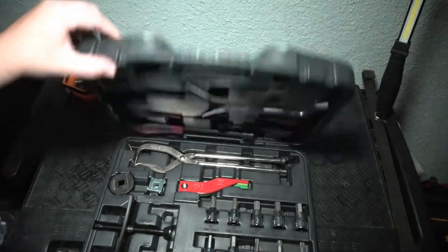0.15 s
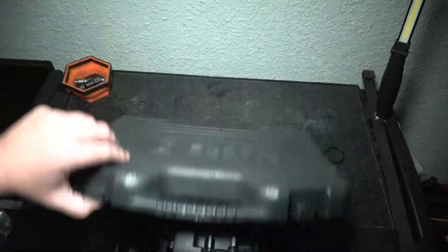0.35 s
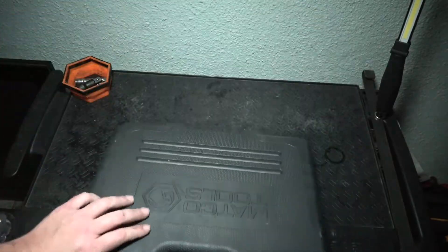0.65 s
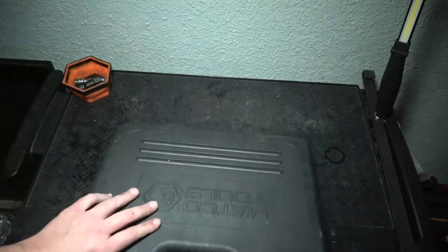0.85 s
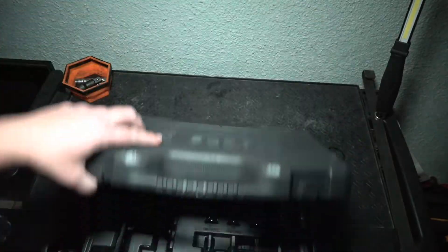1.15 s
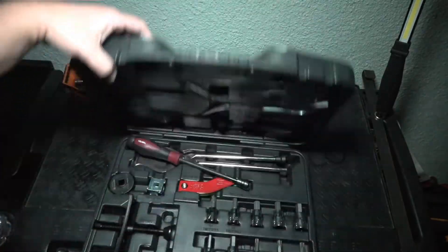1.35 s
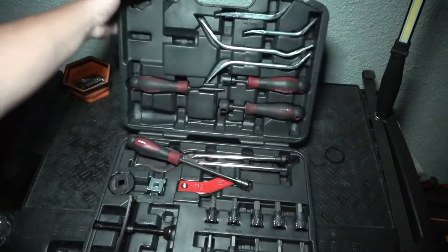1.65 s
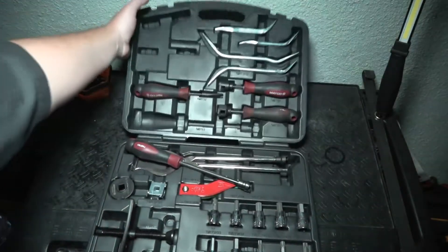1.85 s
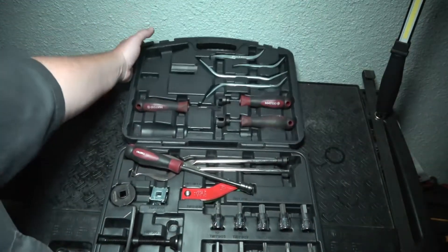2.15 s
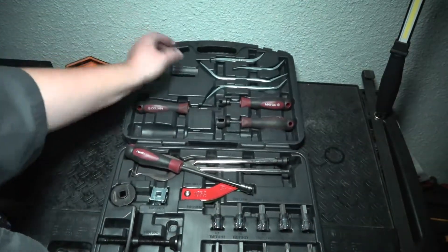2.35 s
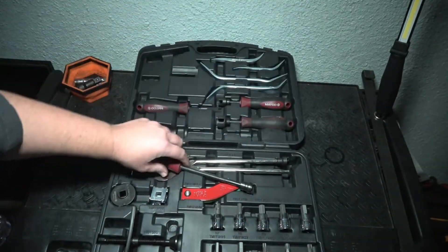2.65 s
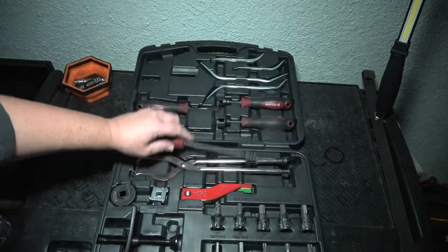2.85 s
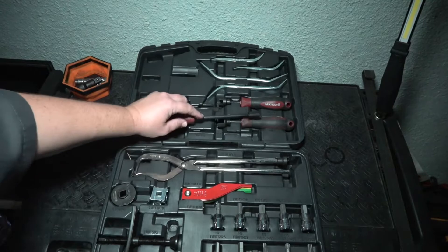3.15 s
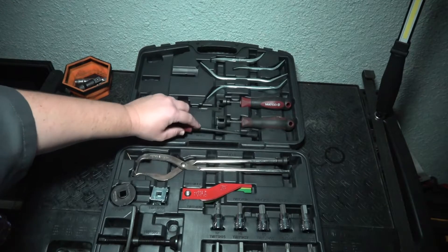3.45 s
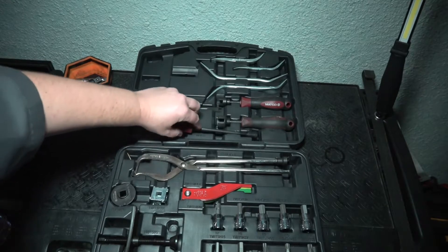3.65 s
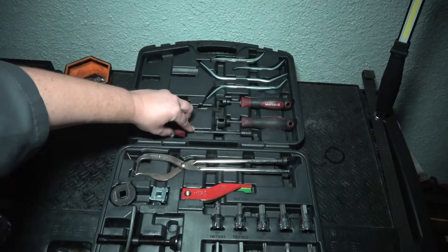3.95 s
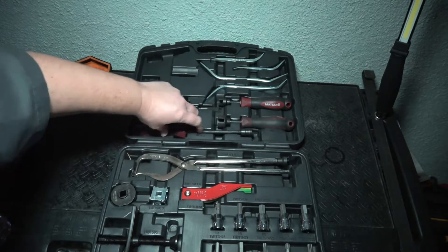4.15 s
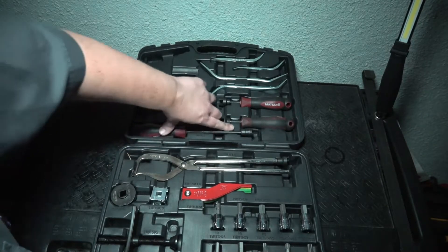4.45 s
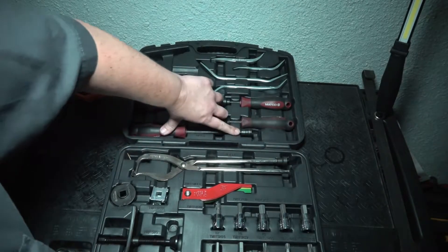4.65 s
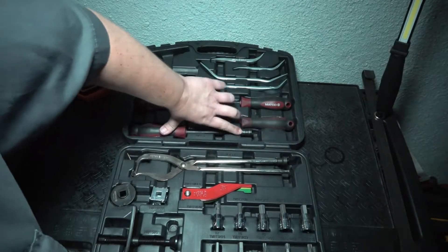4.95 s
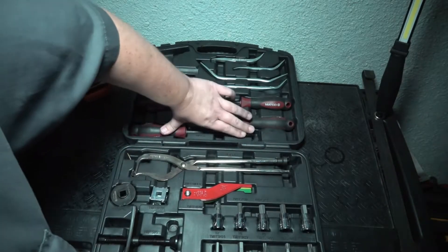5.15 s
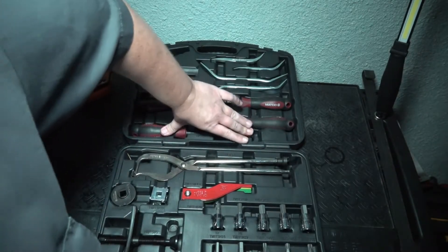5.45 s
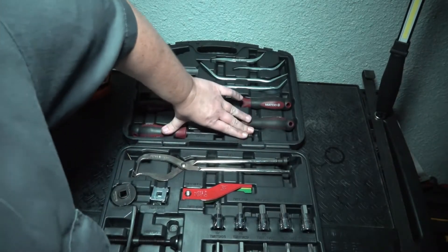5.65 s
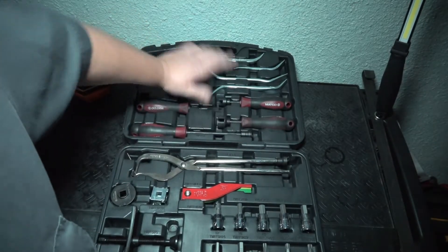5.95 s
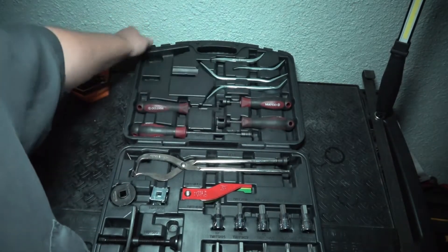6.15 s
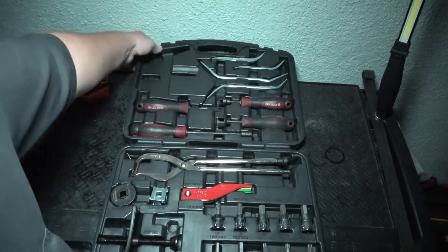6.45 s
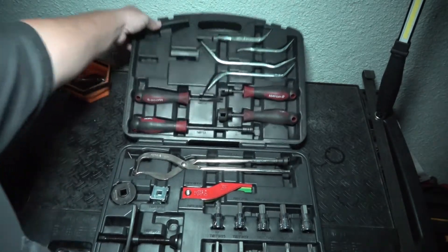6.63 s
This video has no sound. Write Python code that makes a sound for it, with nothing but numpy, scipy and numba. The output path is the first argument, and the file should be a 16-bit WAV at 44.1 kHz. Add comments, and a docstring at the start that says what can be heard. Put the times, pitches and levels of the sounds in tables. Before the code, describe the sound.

A close microphone catches a moulded tool case on a bench: the lid bangs closed, tools jangle, skin and sleeve rustle over plastic, and the lid falls back with a sharp clatter. Separate hard clacks and short gritty scrapes follow as a tool is placed. One huge, flattened thump stands out late, with short dense room reflections, then quiet handling.

```python
"""Plastic tool case on a workbench

A moulded case drops its lid shut with steel tools clattering inside; the lid is lifted and falls open again.
A screwdriver is picked up, pushed into its slot and snapped home with the palm; hand and sleeve rub the case.
Blows are noise bursts plus dying shell modes, tools are dying modes, rubbing is shaped noise.
A small workshop answers with dense reflections, and the limiter of a close camera flattens the loud knocks."""
import sys
import numpy as np
from scipy import signal
from scipy.fft import rfft, irfft
from scipy.io import wavfile
from scipy.ndimage import uniform_filter1d
from numba import njit

SR = 44100
rng = np.random.default_rng(int(sys.argv[2]) if len(sys.argv) > 2 else 0)


def output_pcm(signal):
    """Save a mono or channel-first signal as 16-bit PCM at the path in sys.argv[1].

    Samples are clipped to [-1, 1] before scaling.
    """
    pcm = np.clip(np.atleast_2d(signal).T, -1, 1) * 32767
    wavfile.write(sys.argv[1], SR, np.round(pcm).astype(np.int16))


N = 299288
RING = np.arange(SR // 3) / SR  # time since a blow, s


def amp(db):
    """Decibels to gain."""
    return 10 ** (np.asarray(db) / 20)


def evened(x):
    """Scales to rms 1."""
    return x / np.sqrt(np.mean(x ** 2) + 1e-20)


def unit_hit(x):
    """Scales to the energy of a hundredth of a second at rms 1."""
    return x / np.linalg.norm(x) * np.sqrt(SR / 100)


def read(points, hz):
    """Joins points by straight lines on a log-frequency axis."""
    f, value = np.transpose(points)
    return np.interp(np.log(hz + 1), np.log(f + 1), value)


def add(mix, s, sound):
    """Mixes a sound in at time s."""
    part = mix[round(s * SR):][:len(sound)]
    part += sound[:len(part)]


def noise(spectrum, size):
    """Noise of rms 1 with the shape of a given spectrum."""
    gain = amp(read(spectrum, np.fft.rfftfreq(size, 1 / SR)))
    white = rfft(rng.standard_normal(size))
    return evened(irfft(white * gain, size))


def ring(modes, spread_db):
    """Dying modes; their shares and signs vary at random, as with the spot that is struck."""
    hz, db, t60 = np.transpose(modes)[:, :, None]
    share = amp(db + spread_db * rng.standard_normal(hz.shape)) * rng.choice([-1, 1], hz.shape)
    decay = np.exp(-np.log(1000) * RING / t60)
    return unit_hit((share * decay * np.sin(2 * np.pi * hz * RING)).sum(0))


def shelf(x, hz, db, side):
    """Lifts or lowers the bass or the treble without smearing the attack."""
    band = signal.lfilter(*signal.butter(1, hz, side, fs=SR), x)
    return x + (amp(db) - 1) * band


def causal(spectrum, size=4096):
    """The sharpest click that has a given spectrum: minimum phase packs its energy at the front."""
    hz = abs(np.fft.fftfreq(size, 1 / SR))
    log_gain = np.log(amp(np.maximum(read(spectrum, hz), -100)))
    click = np.fft.ifft(np.exp(np.conj(signal.hilbert(log_gain)))).real
    return click[:size // 2]


def echoes(build_s=0.0049):
    """Dense reflections that build up quickly and die by band; each spot on the bench has its own."""
    # decay of the workshop: hz, t60_s
    room_decay = [(120, 0.35), (320, 0.21), (900, 0.25), (2500, 0.24), (6000, 0.27), (14000, 0.2)]
    hz, t, z = signal.stft(rng.standard_normal(len(RING)), SR, nperseg=256)
    decay = np.exp(-np.log(1000) * t / read(room_decay, hz)[:, None])
    tail = signal.istft(z * decay, SR, nperseg=256)[1][:len(RING)]
    tail = tail * (1 - np.exp(-(RING / build_s) ** 2))
    return tail / np.linalg.norm(tail)


def room(x, wet_db):
    """A sound with its reflections."""
    return x + amp(wet_db) * signal.fftconvolve(x, echoes())[:len(x)]


def grain(depth_db, size):
    """Uneven grip: a gain that flickers as a surface catches and slips; size smooths it, in samples."""
    wander = evened(uniform_filter1d(rng.standard_normal(N), size))
    return evened(amp(abs(depth_db * wander)))


def motion(t):
    """Gains of rumble and rustle: each move gets going, holds and dies away; overlaps add in power."""
    # hand and sleeve shut the lid, raise it, reach for the screwdriver, work it in, hold it,
    # press with the palm and reach for the lid again (levels ahead of the rubbing's own trim):
    # start_s, length_s, hollow_rumble_db, rustle_db
    moves = [(-.05, 0.12, -31.5, -38), (0.11, 0.71, -33.5, -36), (0.815, 0.31, -31.5, -43.5),
             (1.221, 1, -38.5, -39), (2.57, 0.25, -42, -56), (3.708, 0.84, -41, -42),
             (4.707, 0.7, -49, -52.5), (5.154, 0.11, -32, -50.5), (5.374, 0.46, -37.5, -46.5),
             (5.844, 0.41, -42, -47.5), (6.275, 0.58, -41, -42.5)]
    attack_share, release_s = 0.11, 0.062  # a long move gets going more slowly than a short one
    idle_rumble_db, idle_rustle_db = -48, -55.5  # the arm is never quite still
    rumble, rustle = amp(idle_rumble_db) ** 2, amp(idle_rustle_db) ** 2
    for start, length, rumble_db, rustle_db in moves:
        attack = np.clip((t - start) / (attack_share * length), 0, 1)
        release = np.exp(-np.clip((t - start - length) / release_s, 0, 20))
        speed = attack * release
        rumble = rumble + (amp(rumble_db) * speed) ** 2
        rustle = rustle + (amp(rustle_db) * speed) ** 2
    return np.sqrt(rumble), np.sqrt(rustle)


def slides(t, rows, grit, fizz_hz=7000):
    """Each slide swells and fades over the gritty surface, with its own share of fizz in the high treble."""
    out = np.zeros(N)
    for middle, half, db, fizz_db in rows:
        near = abs(t - middle) < 10 * half
        swell = np.exp(-.5 * ((t[near] - middle) / half) ** 2)
        out[near] += amp(db) * swell * shelf(grit[near], fizz_hz, fizz_db, "high")
    return out


def in_slot(x, plain_db=-6):
    """The walls of the slot resonate and colour whatever scrapes along them."""
    # resonances of the screwdriver's slot: hz, width_hz, level_db
    slot_modes = [(950, 190, 0.5), (2840, 300, -1.5), (4540, 230, -10), (5500, 560, -7)]
    walls = np.zeros(len(x))
    for hz, width, db in slot_modes:
        walls += amp(db) * signal.lfilter(*signal.iirpeak(hz, hz / width, fs=SR), x)
    return evened(amp(plain_db) * x + walls)


def rubbing():
    """Skin, cloth and tool handles slide over the case as flickering noise; the case rumbles under them."""
    # hollow case under a moving hand: hz, relative_db_per_hz
    rumble_spectrum = [(30, -6), (90, 1), (200, 3.5), (380, -1.5), (700, -6.5), (1500, -24.5), (4000, -75)]
    # skin and sleeve on plastic: hz, relative_db_per_hz
    rustle_spectrum = [(100, -19), (600, 8), (1600, 10), (2600, 7), (4000, 2.5), (6000, 1.5), (8000, -8),
                       (12000, -11.5), (16000, -22)]
    # scrape on grained plastic: hz, relative_db_per_hz
    scrape_spectrum = [(100, 8), (500, 9.5), (1500, 8.5), (3000, 6), (6000, 2), (8000, -6.5), (12500, -9),
                       (16000, -38)]
    # short slides over the grained plastic, ahead of the trim: middle_s, half_length_s, level_db, fizz_db
    plain_scrapes = [(0.446, 0.035, -15, 5.5), (1.635, 0.097, -32, 0.5), (1.698, 0.043, -48.5, 23),
                     (2.131, 0.03, -29.5, -11), (5.278, 0.011, -32, -1), (6.33, 0.044, -42.5, 11.5),
                     (6.696, 0.015, -35.5, 7)]
    # the screwdriver along its slot, ahead of the trim: middle_s, half_length_s, level_db, fizz_db
    slot_scrapes = [(3.745, .012, -27.5, -8), (3.79, 0.011, -24, -2), (3.849, 0.022, -22, 2.5),
                    (4, 0.016, -31.5, 10.5), (4.164, 0.11, -39.5, -14), (4.479, 0.012, -43, 13),
                    (4.526, 0.013, -36.5, 10.5), (5.56, 0.014, -23, -25)]
    trim_db = -2.0
    t = np.arange(N) / SR
    rumble_gain, rustle_gain = motion(t)
    rumble = rumble_gain * noise(rumble_spectrum, size=N) * grain(depth_db=3.0, size=900)
    rustle = rustle_gain * noise(rustle_spectrum, size=N) * grain(depth_db=1.5, size=200)
    grit = noise(scrape_spectrum, size=N) * grain(depth_db=3.5, size=24)
    scrapes = slides(t, plain_scrapes, grit) + slides(t, slot_scrapes, in_slot(grit))
    return amp(trim_db) * room(rumble + rustle + scrapes, wet_db=-10.5)


def blows(count=2):
    """Every contact: hard knocks rebound, with level, bass and treble changing each time; soft bumps do not."""
    # hard blows of lid and tools, relative levels:
    # start_s, level_db, bass_weight_db, treble_hardness_db, level_change_per_rebound_db
    hard_knocks = [(.196, -10.5, 0, -9, -2), (.258, 7.5, 0.5, -1, -4), (0.311, -9, 12, -3, -5.5),
                   (0.3514, -4.5, 13.5, -14, -32), (0.393, 0, 10, -11, -25), (0.4192, 0.5, 7, -16, -4.5),
                   (0.457, 4, -4, -9, -3.5), (0.5124, 3, -32, -12, -7.5), (0.6041, -17.5, 12, -16, -23),
                   (0.6223, -10, 8, -30, -13), (1.0054, -3.5, -20, -29, -25), (2.1526, -11, 9, -22, -22),
                   (2.1672, -14.5, -10, -3, -9), (2.1893, -16, -17, -4, -13), (2.2008, -4, 2, -11, -8),
                   (2.211, -7, 5, 4, -7), (2.2605, 3.5, -3, 2.5, -7.5), (2.279, -2, 2.5, -1, -19),
                   (2.3139, 3, 0.5, -8, -14), (2.3601, -14, 11, -2, -18), (2.7102, -16, -1.5, -17, -6),
                   (2.7559, -11.5, -20, 7, -11), (3.077, 1, 1, -6.5, -6), (3.379, 7.5, -4.5, -6.5, -29),
                   (3.4258, 4, 1, 2, -6.5), (3.7926, -17, 7.5, -2, -2), (3.8631, -3.5, -1.5, -1.5, -14.5),
                   (3.997, -12.5, -10, -2, -14), (4.011, -16, 11.5, 2, -6), (4.024, -7.5, -2, -9, -3),
                   (4.1758, -10.5, 4.5, -21, -11), (4.367, -14.5, 9.5, -3, -9), (5.4803, 30, -26, -5, -24)]
    # fingers and palm bump the shell, relative levels: start_s, level_db
    soft_bumps = [(0.8643, -34), (2.6784, -35), (3.603, -34.5), (4.167, -27), (4.5196, -22), (5.374, -29),
                  (5.873, -30), (6.533, -32)]
    bump_weight_db, bump_hard_db = 12.5, -5
    rebound_s, rebound_scatter = .017, 0.1545  # typical gap and its relative spread
    rebound_weight_db, rebound_dull_db = -2, -8  # change of bass and treble with each rebound
    rows = []
    for s, db, weight_db, hard_db, rebound_db in hard_knocks:
        gap_s = rebound_s * (1 + rebound_scatter * rng.uniform(-1.023, 1))
        for k in range(count + 1):
            weight = weight_db + k * rebound_weight_db
            hardness = hard_db + k * rebound_dull_db
            rows.append((s + k * gap_s, db + k * rebound_db, weight, hardness))
    for s, db in soft_bumps:
        rows.append((s, db, bump_weight_db, bump_hard_db))
    return np.array(rows)


def crack(crack_s, boom_s, wet_db, rattle_db, ribs_db, tick_db,
          rattle_s=0.03, rattles_per_s=150, rib_t60=0.083, count=7):
    """A tick, then crowded wall modes that die treble first; ribs ring, loose tools chatter, the room answers."""
    # colour of a blow on the plastic: hz, relative_db_per_hz
    crack_spectrum = [(30, -34), (100, -4), (230, 5.5), (500, 6), (900, -1), (1300, -3.5), (2000, -3.5),
                      (3200, -10), (5500, -14), (8000, -26), (12000, -34), (16000, -54)]
    size = len(RING)
    burst = rng.standard_normal(size)
    low = signal.lfilter(*signal.butter(1, 700, fs=SR), burst)
    walls = low * np.exp(-RING / boom_s) + (burst - low) * np.exp(-RING / crack_s)

    brief = rng.standard_normal(size) * RING * np.exp(-RING / 0.00038)
    tick = signal.lfilter(*signal.butter(2, 3500, "high", fs=SR), brief)

    rib_hz = np.geomspace(900, 5600, count) * rng.uniform(.85, 1.15, count)
    ribs = ring([(hz, 0, rib_t60) for hz in rib_hz], spread_db=6.0)

    # random contacts, each a tiny dying burst
    contacts = (rng.random(size) < rattles_per_s / SR) * rng.uniform(0.62, 1, size)
    chatter = signal.lfilter([1], [1, -np.exp(-1 / (0.00078 * SR))], contacts) * rng.standard_normal(size)
    chatter = unit_hit(chatter * np.exp(-RING / rattle_s))

    direct = unit_hit(walls) + amp(tick_db) * unit_hit(tick)
    direct = direct + amp(ribs_db) * ribs + amp(rattle_db) * chatter
    click = causal(crack_spectrum)
    answered = direct + amp(wet_db) * unit_hit(echoes())
    return signal.fftconvolve(answered, click / np.linalg.norm(click))[:size]


def knocks(rows, modes, modes_db, crack_db, bass_hz, treble_hz, edge_share, swell_s, radiate_hz, **texture):
    """Each blow cracks against the walls and rings the hollow shell; a harder contact has more treble."""
    out = np.zeros(N)
    for s, db, weight_db, hard_db in rows:
        shell = room(ring(modes, spread_db=1.5), wet_db=-8)
        shell = shell * (1 - np.exp(-RING / swell_s))  # the shell takes a moment to get moving
        blow = amp(crack_db) * crack(**texture) + amp(modes_db) * shell
        blow = shelf(blow, bass_hz, weight_db, "low")
        blow = shelf(blow, treble_hz, hard_db, "high")
        blow = shelf(blow, 5100, edge_share * hard_db, "high")
        add(out, s, amp(db) * blow)
    # a small box radiates little deep bass
    return signal.lfilter(*signal.butter(2, radiate_hz, "high", fs=SR), out)


def clacks():
    """A tool slaps one rib or pocket wall, whose few fast-dying modes give a short pitched clack."""
    # slaps, each with its own pitch: start_s, level_db, pitch_hz
    slaps = [(0.197, -18, 2010), (.2095, -24, 2010), (0.2136, -21.5, 1370), (.2585, -4.5, 1860),
             (.266, 0, 890), (0.3518, -19.5, 1970), (0.5009, -14, 1920), (0.624, -3.5, 530),
             (1.9944, -31.5, 1450), (2.036, -37, 1440), (2.19, -20, 1450), (2.22, -19, 1470),
             (2.2648, -8, 1680), (2.3347, -15.5, 1810), (2.763, -18.5, 805), (3.8651, -15, 1855),
             (4.0253, -22.5, 2640), (4.177, -22.5, 985), (5.874, -28.5, 1116), (6.534, -38, 646)]
    # modes of a rib: multiple_of_pitch, relative_db, t60_s
    rib_modes = [(1, 3.5, 0.02), (1.36, -1.5, 0.015), (2.1, -13.5, 0.007)]
    out = np.zeros(N)
    for s, db, hz in slaps:
        modes = [(multiple * hz, mode_db, t60) for multiple, mode_db, t60 in rib_modes]
        add(out, s, amp(db) * room(ring(modes, spread_db=2.5), wet_db=-8))
    return out


def tools():
    """Struck tools ring briefly in their own modes, damped by the slots that hold them."""
    # tools struck: start_s, level_db, what_rings
    clinks = [(.458, -35, "levers"), (0.4983, -5.5, "levers"), (0.5126, -5, "levers"),
              (0.6053, -25, "levers"), (0.621, -26, "levers"), (2.2588, -22, "shaft"),
              (2.7569, -17.5, "shaft"), (2.8198, -28, "shaft"), (3.3807, 2.5, "handle"),
              (3.4251, -8.5, "tip")]
    # modes of each part, all with columns: hz, relative_db, t60_s
    levers = [(828, 6, .16), (890, 6, .09), (999, 9.5, .15), (1297, -5, .12), (1895, 2, .11),
              (2239, -2, .12), (2985, -10, .1), (3020, 0, .17), (4660, -21, .3)]
    shaft = [(1636, -1, .05), (2131, -4, .05), (2530, -5, .05), (3520, -1, .03), (3730, 1, .03),
             (4290, -4, .04), (5060, -6, .06)]
    handle = [(980, -1, 0.011), (1740, 2, 0.02), (3600, -6, 0.013), (5200, -9, 0.021)]
    tip = [(2530, 2, .008), (4110, -6, .01), (4940, -3, .01), (6060, 0, .012), (7480, -4, .009),
           (9040, -11, .007)]
    modes = {"levers": levers, "shaft": shaft, "handle": handle, "tip": tip}
    out = np.zeros(N)
    for s, db, tool in clinks:
        add(out, s, amp(db) * room(ring(modes[tool], spread_db=1.5), wet_db=-13.0))
    return out


def shove():
    """The falling lid, then the palm, shove case and bench: one slow push of air and its rebound."""
    # shoves: start_s, level_db, push_time_s
    pushes = [(2.261, -4, 0.0031), (5.4812, 25, 0.0016)]
    out = np.zeros(N)
    for s, db, push_s in pushes:
        u = RING / push_s
        pulse = (1 - u) * np.exp(-u) * (1 - np.exp(-10 * u))
        add(out, s, amp(db) * pulse)
    return out


def ticks():
    """A nail or a tool's edge, too light to move the shell: a thin burst of noise from one rib."""
    # touches on a rib: start_s, level_db
    touches = [(4.0944, -36.5), (4.186, -42), (4.206, -35.5), (4.4908, -30.5), (5.01, -48), (5.2186, -41.5),
               (5.871, -37), (6.605, -36.5)]
    # colour of a touch: hz, relative_db_per_hz
    tick_spectrum = [(300, -10), (1500, 0), (3500, 9.5), (6000, 4.5), (9000, -1.5), (13000, -8),
                     (16000, -27)]
    decay_s = 0.0051
    out = np.zeros(N)
    for s, db in touches:
        burst = unit_hit(noise(tick_spectrum, size=len(RING)) * np.exp(-RING / decay_s))
        add(out, s, amp(db) * room(burst, wet_db=-5.5))
    return out


def scene():
    """Case, tools and hands over the quiet air of the workshop."""
    # shell modes with the lid down: hz, relative_db, t60_s
    shut_case = [(130, -10.5, 0.27), (175.7, -2, 0.14), (237, -36, 0.36), (413, 1.5, 0.2), (454, 3, 0.064),
                 (496, 12.5, 0.06), (590, -0.5, 0.12), (733, -2, 0.094), (860, 2, 0.13), (918, 3, 0.066)]
    # shell modes with the lid up: hz, relative_db, t60_s
    open_case = [(149.8, -8, 0.13), (171.4, -9.5, 0.25), (240.6, 0, 0.12), (336.5, 5, 0.13),
                 (363.5, 4.5, 0.1), (420.5, 5, 0.069), (543, 7, 0.039), (624.5, -12.5, 0.19),
                 (962, -6, 0.1), (1049, -14, 0.17), (1438, -4, 0.075), (1630, 0.5, 0.021),
                 (1800, -6, 0.047)]
    # quiet air of the workshop: hz, relative_db_per_hz
    air_spectrum = [(15, -42), (25, -9.5), (97, -3.5), (141, -26), (373, -8), (427, -21.5), (1190, -23.5),
                    (3000, -31), (16000, -41)]
    air_db, lid_opens_s = -46, 1.3
    rows = blows()
    is_shut = rows[:, 0] < lid_opens_s
    shut = knocks(rows[is_shut], shut_case, modes_db=-3.5, crack_db=-5.0, bass_hz=480, treble_hz=1730,
                  edge_share=0.96, swell_s=0.00077, radiate_hz=89, crack_s=0.01, boom_s=0.013,
                  wet_db=-7.5, rattle_db=-11.5, ribs_db=-16.5, tick_db=-20)
    opened = knocks(rows[~is_shut], open_case, modes_db=-2.5, crack_db=-7.5, bass_hz=500, treble_hz=1720,
                    edge_share=0.13, swell_s=0.0049, radiate_hz=55.7, crack_s=0.0065, boom_s=0.013,
                    wet_db=-5.0, rattle_db=-11, ribs_db=-10.0, tick_db=-28.0)
    air = amp(air_db) * noise(air_spectrum, size=N)
    mix = air + rubbing() + shut + opened + clacks() + tools() + shove() + ticks()
    return mix[None]


@njit
def follow(level, rise, fall):
    """A peak detector that charges quickly and leaks slowly."""
    out, held = np.zeros(len(level)), 0.
    for i in range(len(level)):
        held += rise * max(level[i] - held, 0.) - fall * held
        out[i] = held
    return out


def record(dry, limit_db=-8, attack_s=0.0013, release_s=0.022, low_cut_hz=45, edge_hz=15900):
    """The limiter holds loud knocks down; after a low cut, peaks that slip past it clip; then the band limit."""
    peak = follow(abs(dry[0]), 1 / (attack_s * SR), 1 / (release_s * SR))
    limited = dry / np.maximum(peak / amp(limit_db), 1)
    low_cut = signal.lfilter(*signal.butter(1, low_cut_hz, "high", fs=SR), limited)
    clipped = np.clip(low_cut, -1, 1)
    band_limit = signal.firwin(511, edge_hz, window=("kaiser", 9), fs=SR)
    return signal.oaconvolve(clipped, band_limit[None], "same")


dry = scene()
out = record(dry)
output_pcm(out)
```